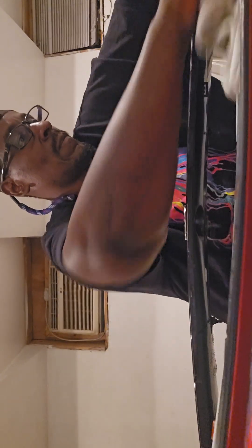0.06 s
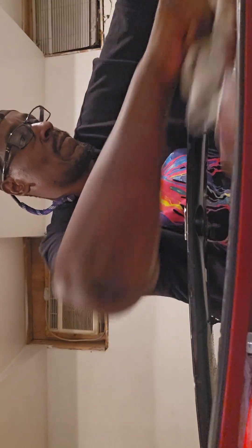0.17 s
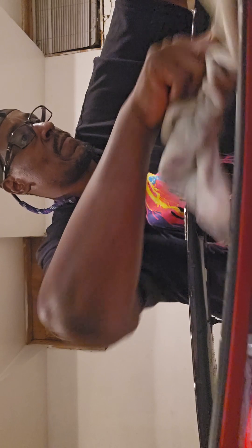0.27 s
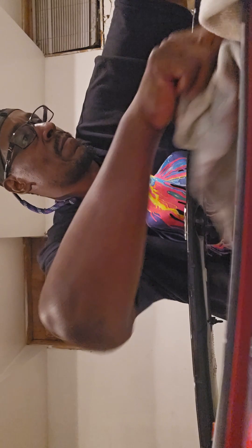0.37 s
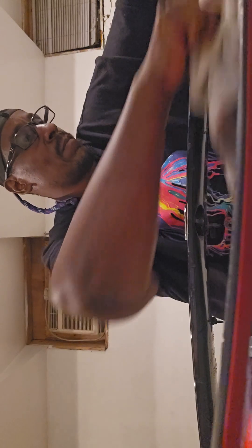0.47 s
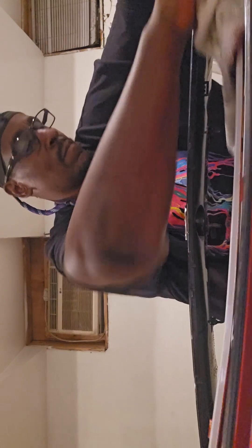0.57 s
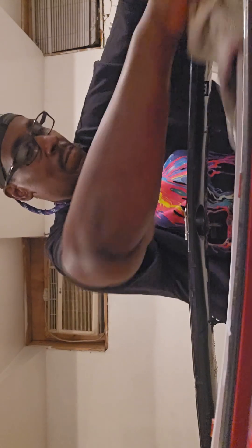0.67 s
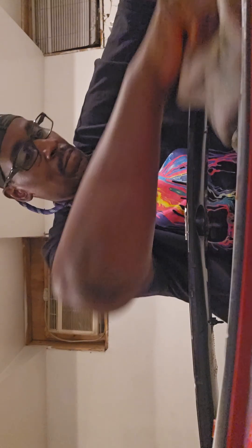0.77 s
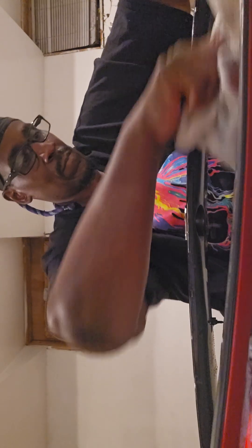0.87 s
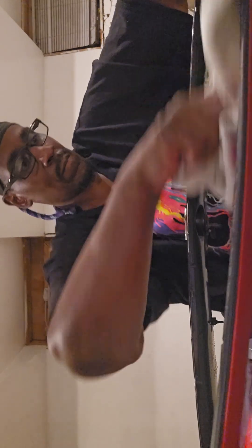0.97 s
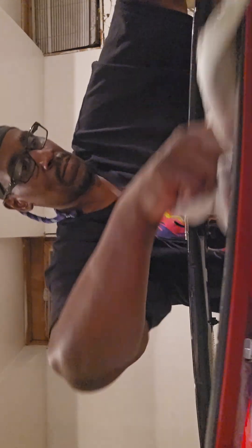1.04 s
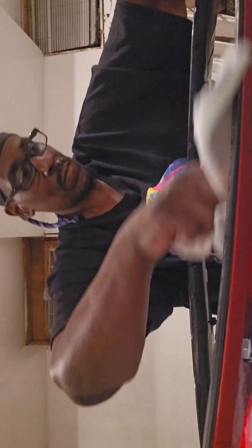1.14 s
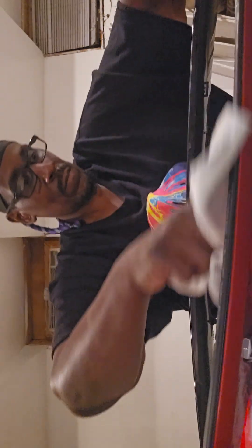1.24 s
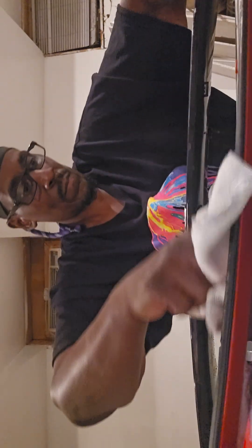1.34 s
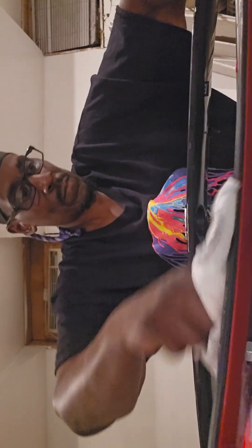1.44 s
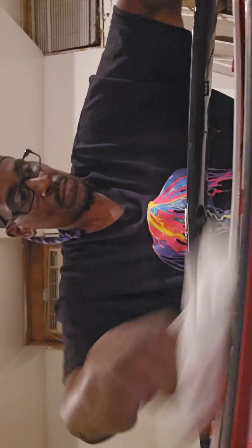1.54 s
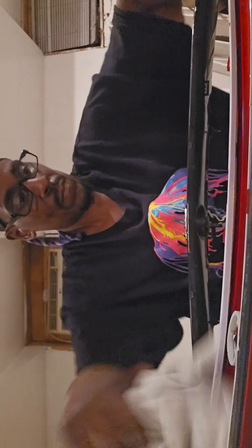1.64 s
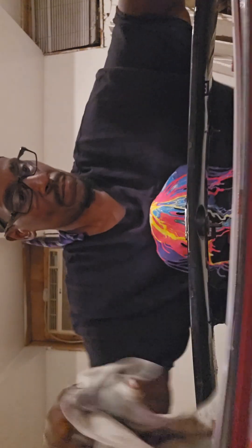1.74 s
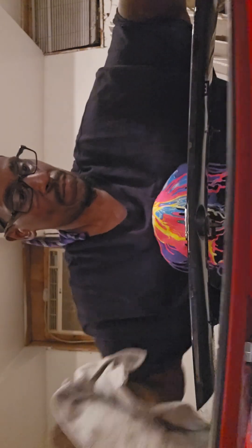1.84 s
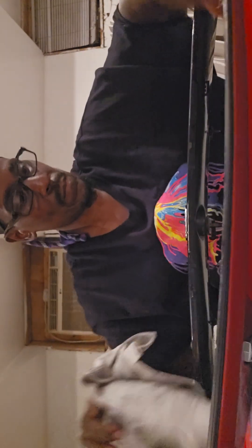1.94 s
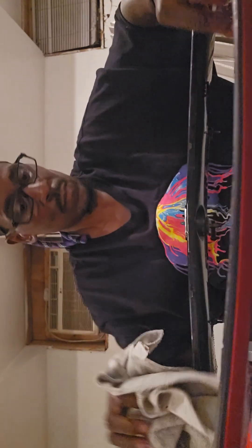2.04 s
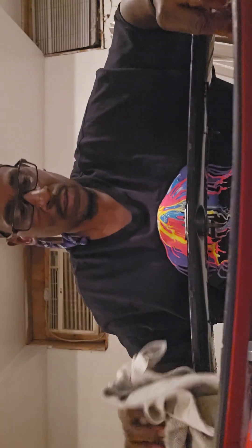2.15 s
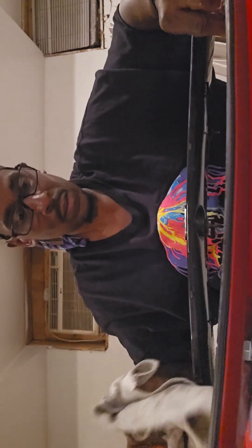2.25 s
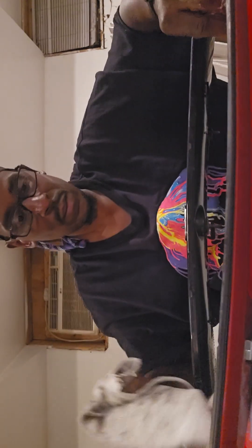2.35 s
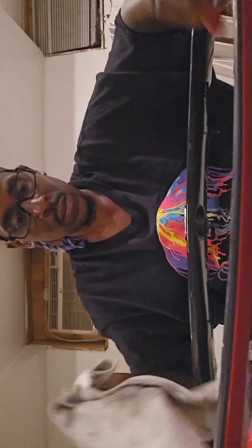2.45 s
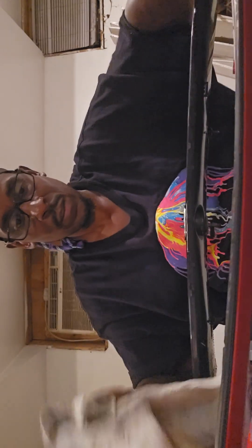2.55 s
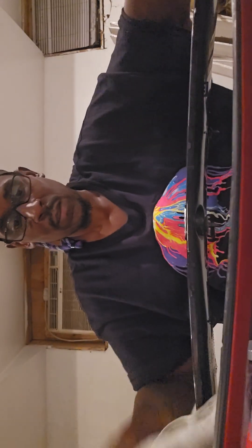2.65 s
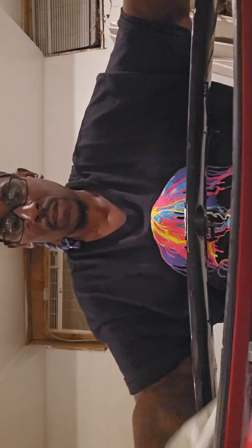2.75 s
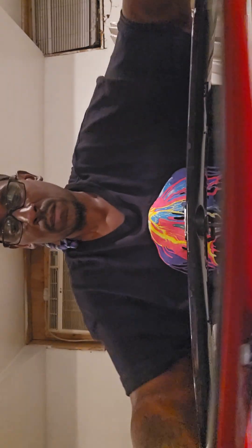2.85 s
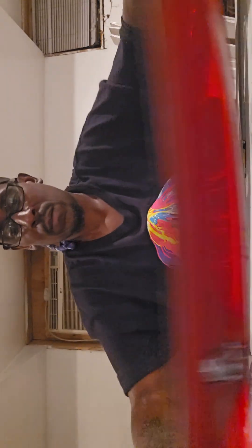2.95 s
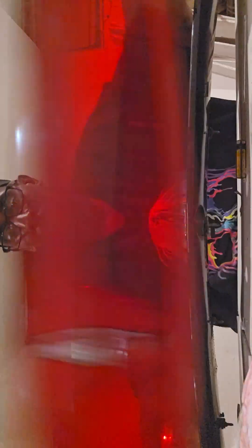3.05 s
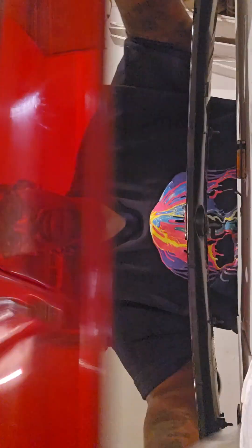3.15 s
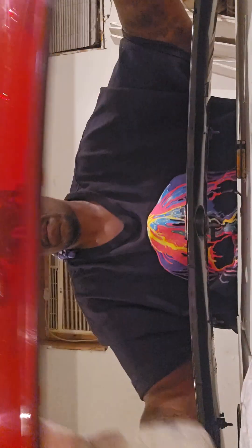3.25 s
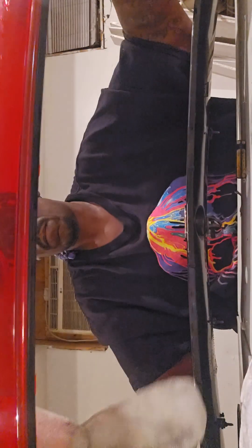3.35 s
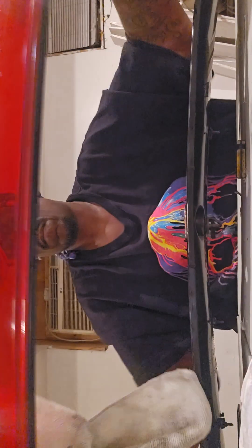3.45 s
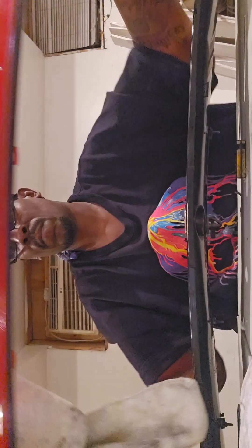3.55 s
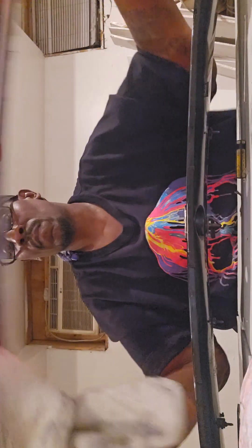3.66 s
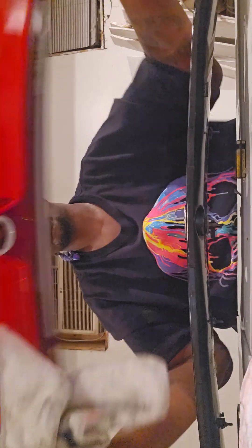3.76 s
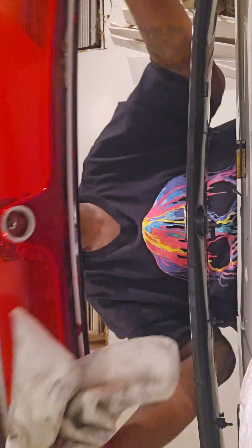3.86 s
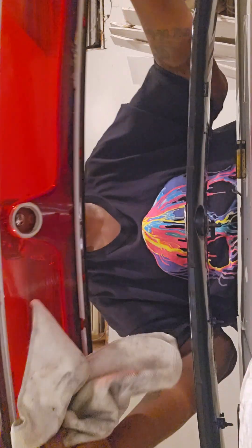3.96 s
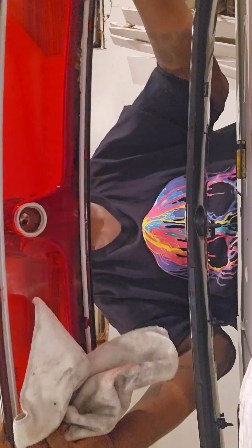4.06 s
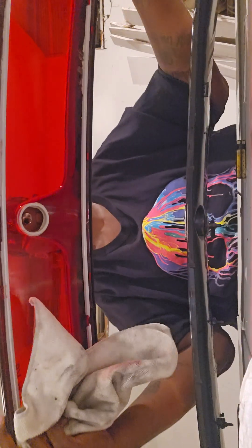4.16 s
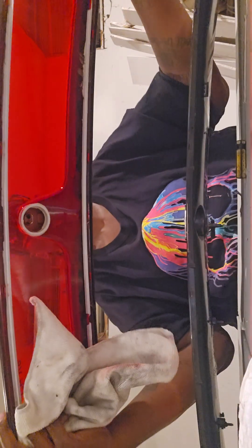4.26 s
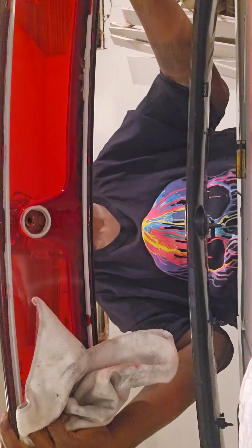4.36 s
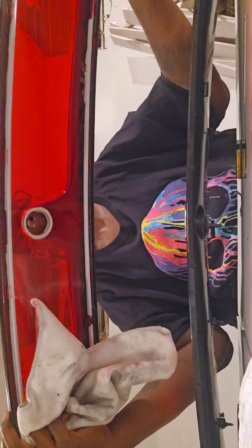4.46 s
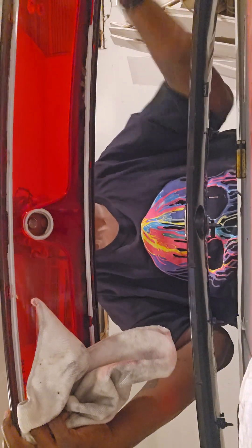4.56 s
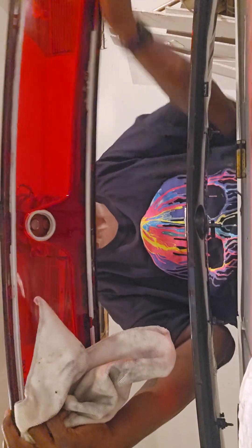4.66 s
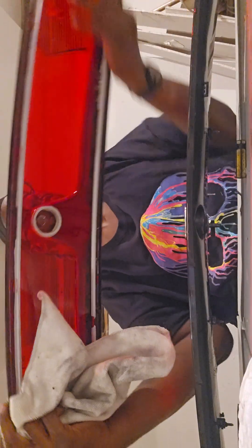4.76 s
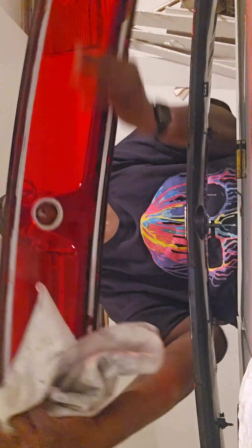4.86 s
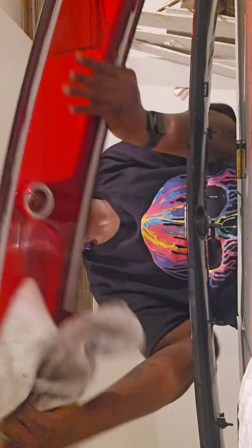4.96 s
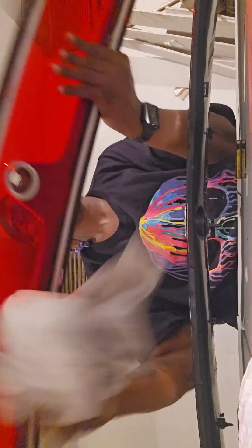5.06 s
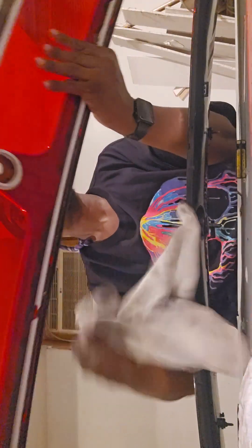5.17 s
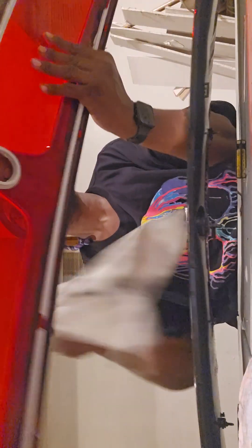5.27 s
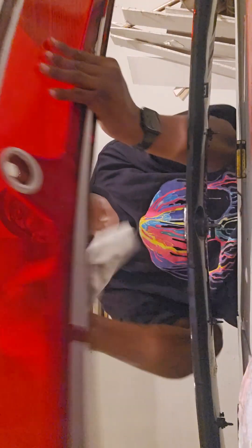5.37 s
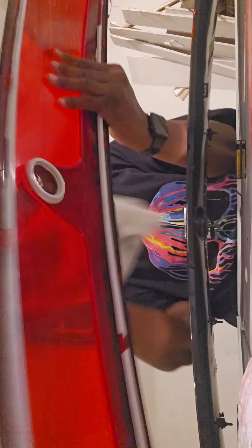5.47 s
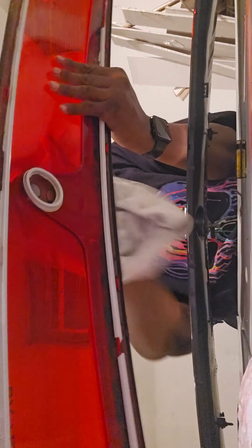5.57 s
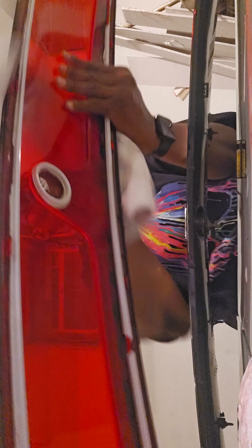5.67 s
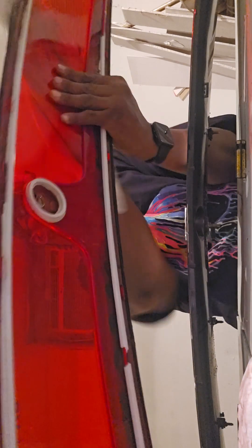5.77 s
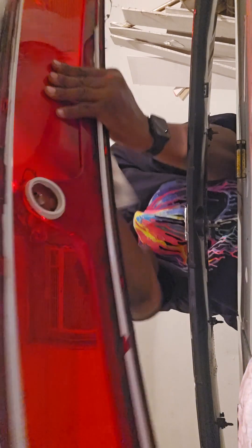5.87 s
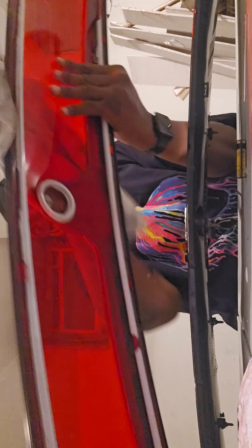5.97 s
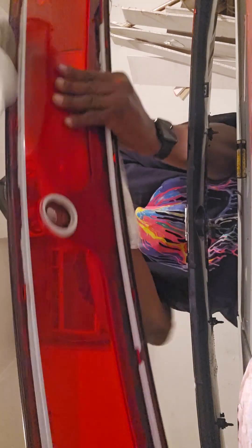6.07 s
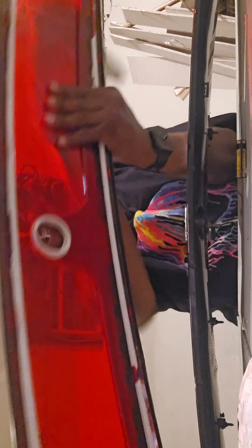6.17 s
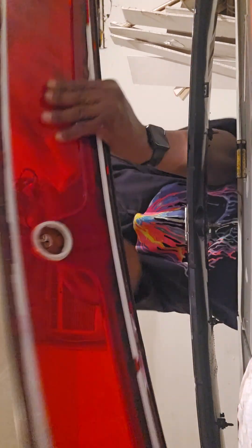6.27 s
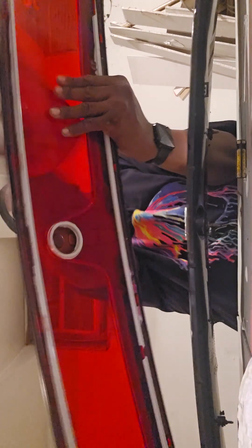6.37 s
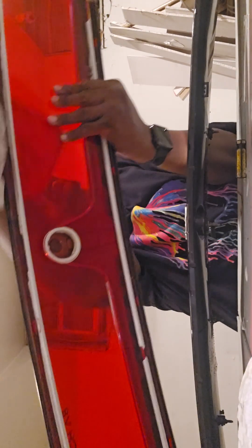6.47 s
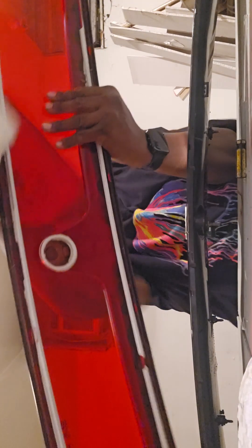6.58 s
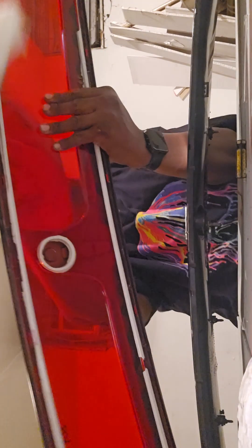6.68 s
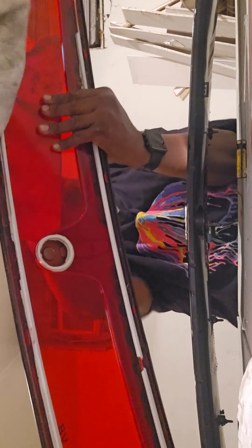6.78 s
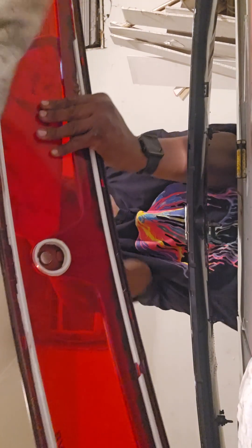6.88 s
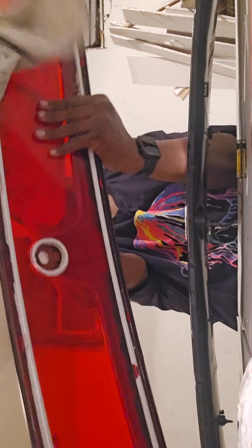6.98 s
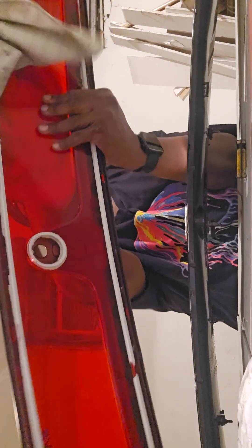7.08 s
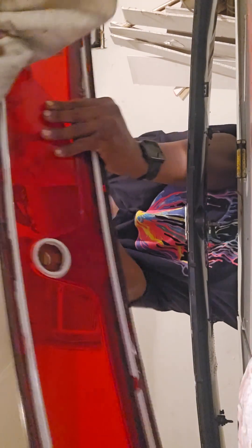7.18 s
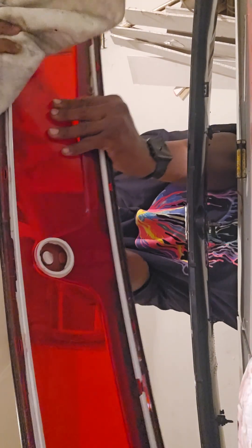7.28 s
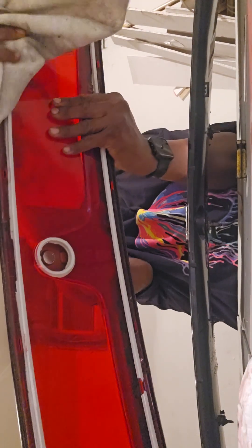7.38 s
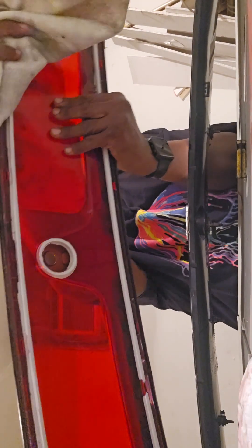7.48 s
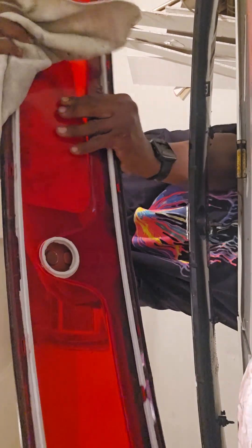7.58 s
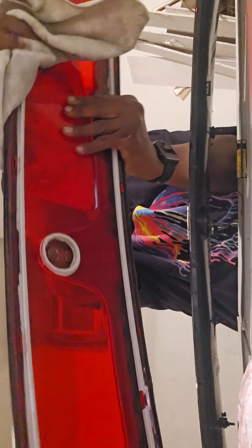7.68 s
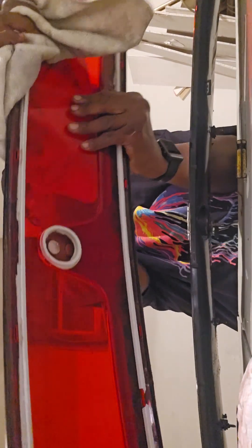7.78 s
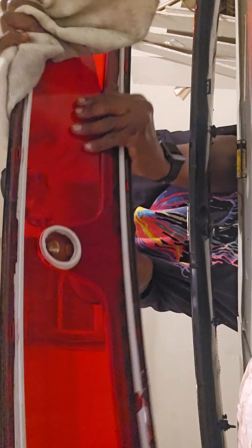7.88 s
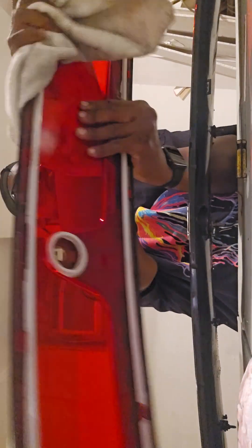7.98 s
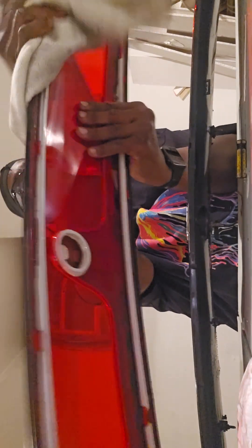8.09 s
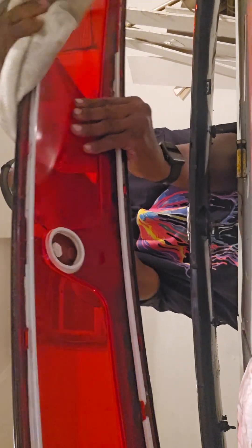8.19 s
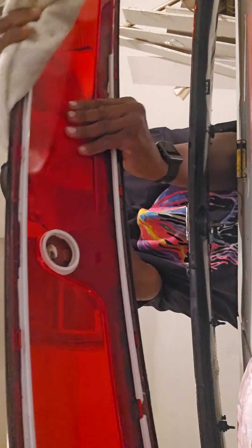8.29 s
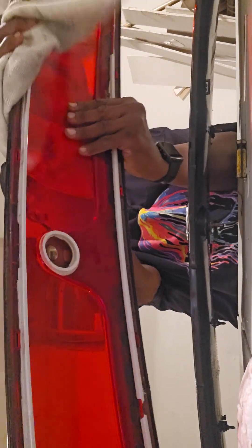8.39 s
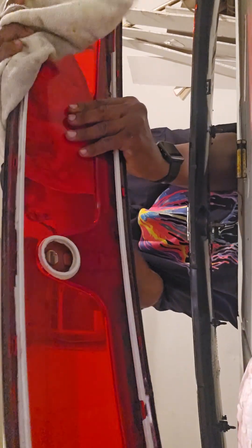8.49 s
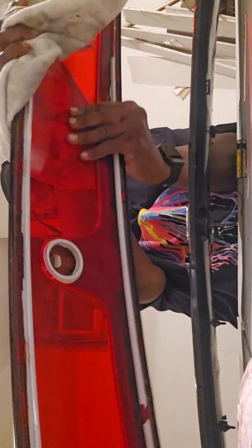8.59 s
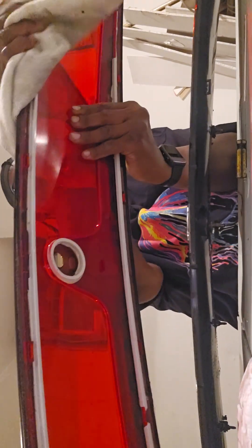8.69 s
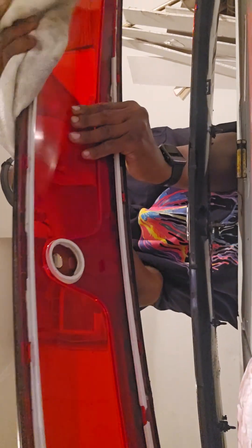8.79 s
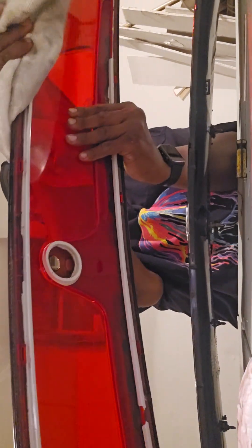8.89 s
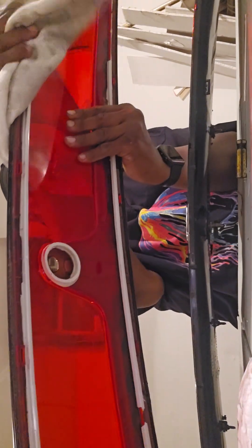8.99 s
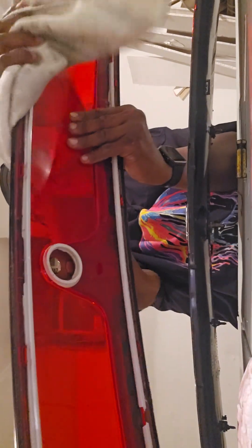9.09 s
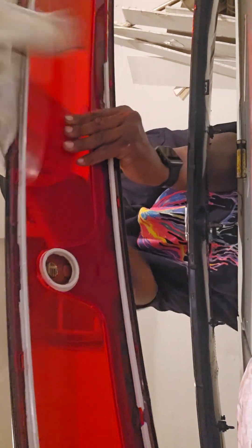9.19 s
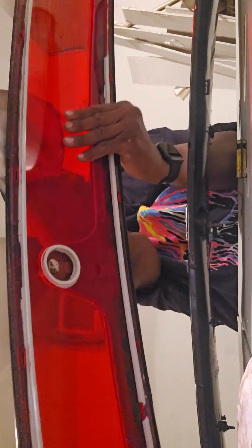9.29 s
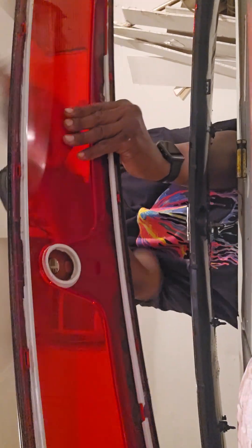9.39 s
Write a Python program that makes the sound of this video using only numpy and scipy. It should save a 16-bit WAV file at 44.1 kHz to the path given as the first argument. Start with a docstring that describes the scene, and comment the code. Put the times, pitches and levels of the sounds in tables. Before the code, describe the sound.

Close up in a small workshop, a cloth wipes a hollow plastic lens, starting with a cluster of sharp clicks. A scrape, a dull bump and a brief crackle of bunched cloth follow, then the handling goes quiet. The wiping resumes with heavier hollow knocks and scattered ticks, shifting from slightly left towards the right. The contacts have a short room echo, and a low hum wavers underneath.

```python
"""A dry cloth wipes a long plastic lamp lens on a bench in a small workshop, close to a phone's two mics.
The cloth drags and hisses in strokes, and crackles once as it is bunched up. The hollow lens booms when
the hand bumps it; its stiff edge ticks and scrapes on a frame. These contacts wake a short room echo.
Halfway through, the sound shifts from the left mic towards the right. A low hum wavers underneath."""
import sys
import numpy as np
from scipy import signal
from scipy.fft import rfft, irfft, next_fast_len
from scipy.io import wavfile

SR = 44100
rng = np.random.default_rng(int(sys.argv[2]) if len(sys.argv) > 2 else 0)


def waveform_to_disk(signal):
    """Save audio, clipped to [-1, 1], as 16-bit WAV at the path in sys.argv[1]."""
    frames = np.transpose(np.atleast_2d(signal))
    scaled = np.clip(frames, -1, 1) * 32767
    samples = np.round(scaled).astype(np.int16)
    wavfile.write(sys.argv[1], SR, samples)


N = 416304

# modes of the stiff edge and the frame: pitch_hz, level_db, t60_s
EDGE_MODES = [(525, 15, 0.015), (712, -10, 0.091), (808, -10, 0.14), (985, 6.5, 0.028), (1214, 4.5, 0.039),
              (1544, 6, 0.0088), (1661, -5.5, 0.13), (1879, 6.5, 0.029), (2066, -1.5, 0.075),
              (2212, 8, 0.016), (2980, -2, 0.0099), (3520, -0.5, 0.014), (3600, -4, 0.028),
              (3630, -6.5, 0.02)]
# where the work sits between the mics: time_s, left_lag_ms, wiping_pan_db (positive is left)
POSITION = [(0, -0.31, 0.5), (1, -0.12, 0.5), (2.4, -0.097, 0), (2.7, -0.27, 0), (3.2, -0.18, -1),
            (4.6, -0.13, 2), (5.2, -0.2, 0.5), (5.5, 0.35, -1.5), (7, .38, -0.5), (7.6, 0.37, -0.5),
            (9.44, 0.46, -1)]


def from_db(db):
    """Decibels to gain."""
    return 10 ** (np.asarray(db) / 20)


def rms_one(x):
    """Scale to unit power."""
    return x / np.sqrt(np.mean(x ** 2) + 1e-20)


def peak_one(x):
    """Scale to unit peak."""
    return x / np.max(np.abs(x))


def in_time(rows):
    """Columns of a curve at every sample."""
    times, *columns = np.transpose(rows)
    return [np.interp(np.arange(N) / SR, times, column) for column in columns]


def at_hz(points, hz):
    """A spectrum read on a log-frequency axis."""
    freqs, values = np.transpose(points)
    return np.interp(np.log(hz), np.log(freqs), values)


def every_sample(coarse):
    """Fill in a level known at every 64th sample."""
    return np.interp(np.arange(N) / 64, np.arange(len(coarse)), coarse)


def drift(rate_hz):
    """Slow random wander with spread 1, at every 64th sample."""
    r = np.exp(-2 * np.pi * rate_hz * 64 / SR)
    wander = signal.lfilter([1], [1, -2 * r, r * r], rng.standard_normal(N // 64 + 2002))
    return rms_one(wander[2000:])


def band(x, low_hz, high_hz):
    """Band-pass."""
    return signal.sosfilt(signal.butter(2, [low_hz, high_hz], "band", fs=SR, output="sos"), x)


def sides(pan_db):
    """Left and right gains; positive is left."""
    return from_db(np.array([pan_db / 2, -pan_db / 2]))


def spread(mid, side, mid_share):
    """Left and right from mid and side, mixed by power."""
    return np.sqrt(mid_share) * mid + np.sqrt(1 - mid_share) * side * [[1], [-1]]


def stereo_noise(length, own):
    """Noise both mics share, plus some of each one's own."""
    shared, *apart = rng.standard_normal((3, length))
    return (shared + own * np.array(apart)) / np.sqrt(1 + own ** 2)


def add(out, start_s, sound, pan_db):
    """Lay a short stereo sound into the track."""
    i = round(start_s * SR)
    out[:, i:i + sound.shape[1]] += sides(pan_db)[:, None] * sound[:, :N - i]


def ring(force, modes):
    """A force sets every mode ringing; neighbours swing in opposite sign."""
    out = 0
    for k, (hz, level_db, t60_s) in enumerate(modes):
        r, w = from_db(-60 / (t60_s * SR)), 2 * np.pi * hz / SR
        swing = signal.lfilter([0, np.sin(w)], [1, -2 * r * np.cos(w), r * r], force)
        out = out + (-1) ** k * from_db(level_db) * swing
    return out


def struck(modes, centre_hz, focus_db, chance_db):
    """A contact drives the modes focus_db less per octave from its centre, each with some chance."""
    return [(hz, db - focus_db * abs(np.log2(hz / centre_hz)) + chance_db * rng.standard_normal(), t60_s)
            for hz, db, t60_s in modes]


def stroke_powers():
    """Strokes swell, hold and die over a resting level: each part's power at every 64th sample."""
    # cloth and hand passing over the lens: start_s, hold_s, rumble_db, drag_db, hiss_db, air_db
    strokes = [(0.0, 0.0056, -60, -58.5, -59.5, -55.5), (0.14, 0.15, -59, -65, -62.5, -58.5),
               (0.298, 0.041, -53, -44.5, -46, -64.5), (0.509, 0.22, -50.5, -52.5, -65.5, -62.5),
               (0.829, 0.21, -57, -59.5, -64, -60.5), (1.087, 0.3, -60, -60, -65, -60),
               (1.477, 0.23, -58, -61.5, -69, -64.5), (1.765, 0.04, -51.5, -52.5, -56, -56),
               (1.912, 0.22, -63, -69.5, -72, -66), (2.362, .12, -66, -61.5, -71.5, -71),
               (2.568, 0.31, -62, -68, -77, -78), (2.825, 0.063, -54, -53, -57.5, -71.5),
               (3.01, 0.083, -64, -60, -65.5, -69), (3.226, 0.083, -65.5, -69.5, -69, -64),
               (3.452, 0.36, -74.5, -83, -86, -86.5), (3.786, 0.1, -81, -73, -67.5, -65),
               (3.931, 0.019, -63.5, -66.5, -68, -62), (4.176, 0.033, -80, -88, -78.5, -70),
               (4.679, 0.32, -73.5, -67, -62, -56.5), (5.12, 0.033, -66, -66, -76, -80),
               (5.318, 0.059, -49, -56, -64.5, -59), (5.584, 0.12, -51, -55.5, -61, -69.5),
               (5.778, 0.043, -51.5, -54, -68, -78), (5.92, 0.071, -52, -75, -79.5, -80),
               (6.06, 0.027, -43.5, -49, -68, -81), (6.172, 0.37, -50, -58, -70, -71),
               (6.49, 0.12, -45.5, -52.5, -70, -117), (6.646, 0.13, -46.5, -56, -69.5, -67),
               (6.913, 0.17, -53.5, -64.5, -70.5, -75), (7.2, 0.054, -57, -63, -70, -63.5),
               (7.312, 0.055, -56, -55, -62.5, -87), (7.453, 0.055, -58, -70.5, -76, -84),
               (7.635, .13, -51, -58, -64.5, -68), (7.902, 0.11, -45.5, -62.5, -69.5, -64),
               (8.131, 0.16, -46.5, -53.5, -66, -85), (8.45, 0.12, -54, -66.5, -76, -76),
               (8.609, .08, -45.5, -58.5, -68.5, -63.5), (8.786, .05, -68, -62.5, -76, -75),
               (9.103, 0.0079, -67.5, -68.5, -71, -76), (9.22, 0.084, -52.5, -60.5, -65.5, -64),
               (9.31, 0.034, -48, -65.5, -69.5, -78)]
    # envelopes of rumble, drag, hiss and air: rise_db_per_s, fall_db_per_s, rest_db
    shapes = [(136.5, 67, -72.5), (250, 88, -78), (350, 134, -96.5), (450, 220.5, -102)]
    t = np.arange(N // 64 + 2) * 64 / SR
    start_s, hold_s, *parts_db = (column[:, None] for column in np.transpose(strokes))
    early_s, late_s = np.maximum(start_s - t, 0), np.maximum(t - start_s - hold_s, 0)
    return [from_db(2 * (part_db - rise * early_s - fall * late_s)).sum(axis=0) + from_db(2 * rest_db)
            for part_db, (rise, fall, rest_db) in zip(parts_db, shapes)]


def cloth_wiping(flicker_db, fibres_per_s, fibre_db):
    """Friction noise with snapping fibres, in third-octave bands that each flicker."""
    # spectra of lens rumble, cloth drag, hiss and airy top: freq_hz, density_db
    rumble = [(70, -11.5), (110, 4), (160, 1.5), (230, -3), (350, -9.5), (500, -11), (900, -71)]
    drag = [(250, -27), (450, -5.5), (700, -3), (1000, -9), (1500, -11), (2000, -19), (2800, -15),
            (4500, -29.5)]
    hiss = [(1500, -15.5), (3000, -5), (4200, -7), (5800, -4), (7500, -4), (10000, -18), (13000, -25.5)]
    air = [(6000, -13.5), (9000, 10.5), (12000, 35.5), (16000, -53)]
    # how alike the two mics hear the cloth: freq_hz, mid_share
    likeness = [(60, 0.38), (200, 0.97), (600, 0.71), (2000, 0.57), (5000, 0.34), (12000, .4)]
    edges = 70 * 2 ** np.arange(0, 8.1, 1 / 3)
    centres = np.sqrt(edges[1:] * edges[:-1])
    shares = [from_db(2 * at_hz(part, centres)) * centres for part in (rumble, drag, hiss, air)]
    powers = stroke_powers()
    friction = rng.standard_normal((2, 2, N))   # two mid/side pairs, for alternate bands
    snaps = rng.random(N) < fibres_per_s / SR
    sizes = from_db(fibre_db + 2.5 * np.minimum(rng.exponential(1, N), 5))
    friction[:, 0] += snaps * sizes * rng.choice([-1, 1], N)
    out, common_drift = 0, drift(15)
    for k, hz in enumerate(centres):
        mid, side = map(rms_one, band(friction[k % 2], edges[k], edges[k + 1]))
        level = np.sqrt(sum(power * share[k] / share.sum() for power, share in zip(powers, shares)))
        flicker = from_db(flicker_db * (0.8 * common_drift + drift(18) + 0.5 * drift(5)))
        out = out + every_sample(level * flicker) * spread(mid, side, at_hz(likeness, hz))
    _, pan_db = in_time(POSITION)
    return (out + lens_singing(drag_and_hiss=np.sqrt(powers[1:3]))) * sides(pan_db)


def lens_singing(drag_and_hiss):
    """The rubbed lens sings faintly in two narrow resonances that come and go with the contact."""
    # one resonance under the drag, one under the hiss: pitch_hz, relative_db, t60_s
    resonances = [(2050, -12, 0.021), (5584, -10.5, .012)]
    out = 0
    for level, (hz, relative_db, t60_s) in zip(drag_and_hiss, resonances):
        tone = rms_one(ring(stereo_noise(N, own=0.56), [(hz, 0, t60_s)]))
        out = out + every_sample(level * from_db(relative_db + 3 * drift(4))) * tone
    return out


def low_hum():
    """Noise in three low resonances swells and sinks, nearly alike at both mics."""
    # level of the hum: time_s, level_db
    swells = [(0.0, -58), (0.26, -58), (0.73, -48.5), (2.02, -56), (2.55, -55), (2.84, -43), (3.18, -62),
              (5.12, -69), (5.52, -43.5), (6.42, -69), (6.62, -46), (7.02, -64), (8.12, -56), (8.33, -60.5),
              (8.7, -50.5), (8.96, -63), (9.2, -59), (9.44, -44.5)]
    # its resonances: pitch_hz, width_hz, level_db
    resonances = [(40.8, 31, -5.5), (55.5, 23, -7.5), (75, 23, -2.5)]
    modes = [(hz, db, np.log(1000) / (np.pi * width_hz)) for hz, width_hz, db in resonances]
    mid, side = (rms_one(band(ring(noise, modes), 38, 90)) for noise in rng.standard_normal((2, N)))
    return from_db(in_time(swells)[0]) * spread(mid, side, mid_share=0.95)


def edge_ticks(rattle_s):
    """The edge taps the frame: a sharp crack with a moment of rattle; its dull part rings briefly."""
    # hard contacts: start_s, crack_db, dull_relative_db, dull_centre_hz, bright_relative_db, pan_db
    contacts = [(0.2192, -29.5, -18.5, 1310, -5, 3), (0.2364, -27, -7, 684, -7, 12.5),
                (0.2843, -18, -8.5, 1180, 4, -7), (0.3479, -24, -2.5, 2060, -2, 7.5),
                (0.356, -22.5, -46, 1860, -5, -2), (0.629, -41.5, 8, 1210, -26, 3),
                (1.3726, -30, -23, 710, -13, 3.5), (1.3983, -43, -22, 1430, -21, 21),
                (1.6532, -54.5, 16.5, 1260, -23, 14.5), (1.918, -43, -1, 2110, 3, 0.5),
                (1.943, -31, -16, 1820, -21, 2), (1.963, -33, -16, 1680, -20, 1),
                (2.0772, -50.5, -6, 1720, 22.5, 2), (2.083, -28.5, -19.5, 1240, -22, 4),
                (2.2038, -39, -12.5, 885, -25, 3.5), (2.3264, -60.5, 12, 1660, -21, 9),
                (2.356, -47, 6, 2530, -10, 8), (2.367, -49.5, -17.5, 730, 19.5, -14.5),
                (2.378, -31, -29.5, 2030, -18, 7), (2.4555, -40.5, -16, 810, -26, 12),
                (2.597, -35.5, -16.5, 1310, -37.5, 7), (3.0803, -33, -5, 2296, -34.5, 13.5),
                (3.237, -41.5, -11, 910, -1, 0), (3.2647, -24, -32, 872, -15, 3),
                (4.096, -53.5, -1, 700, -31.5, 3), (4.17, -46.5, -12.5, 768, 6, -1),
                (4.214, -59.5, -22.5, 780, 8, 7), (5.0275, -43.5, -4.5, 780, -18, 8),
                (5.2883, -46.5, -2.5, 980, -7, 15.5), (5.3234, -56, -22.5, 910, 19, -9),
                (5.3722, -30.5, 1.5, 940, -27.5, -3.5), (5.5699, -11.5, -12.5, 1720, -17, -4),
                (5.7914, -33, -7, 2080, -40, -18), (6.0294, -34.5, -4.5, 1960, -36, -19),
                (6.4468, -39, -40, 703, -3, 25), (6.4657, -19.5, -6, 686, -6, -15.5),
                (6.7128, -34, -28, 703, -28, -2), (6.72, -34, -11.5, 740, -32, -13),
                (6.9177, -49, 5, 1790, -26, 10), (7.2941, -22.5, -6.5, 715, -2.5, -9.5),
                (7.6901, -30.5, -4, 1840, -5, 2), (7.9235, -51, -25, 1200, 10, 3.0),
                (7.9605, -39, -23, 734, -6.5, 3), (8.1275, -17.5, -8, 690, -12.5, -10),
                (8.5162, -37, -7.5, 870, -11, 2), (8.6131, -38, 1.5, 960, -27, 2),
                (9.106, -54, -6, 1020, -35, 19), (9.226, -50, 7, 640, -12, 9)]
    out, t = np.zeros((2, N)), np.arange(SR // 10) / SR
    for start_s, crack_db, dull_db, hz, bright_db, pan_db in contacts:
        force = 0.11 * stereo_noise(len(t), own=0.7) * np.exp(-t / rattle_s)
        force[:, 0] += 1   # the impact
        crack = peak_one(band(force, 2800, 14000))
        ringing = ring(force, struck(EDGE_MODES, hz, focus_db=10, chance_db=6.5))
        dull = from_db(dull_db) * peak_one(band(force, 0.55 * hz, 1.24 * hz) + 0.03 * ringing)
        bright = from_db(bright_db) * peak_one(band(force, 8130, 12000))
        add(out, start_s, from_db(crack_db) * (crack + dull + bright), pan_db)
    return out


def edge_scrapes(hard_slips_per_s):
    """The edge slides on the frame in dense uneven slips that hiss and leave it ringing."""
    # slides: start_s, rise_s, fall_s (per 20 dB), dull_db, centre_hz, bright_db, pan_db
    slides = [(.225, 0.0034, 0.025, -38, 1420, -48.5, 6.5), (0.287, 0.0059, 0.06, -31.5, 1490, -33, 0),
              (.24, 0.0038, 0.026, -46.5, 3500, -52, 7), (.62, 0.0043, 0.036, -45.5, 3620, -60, 5),
              (0.729, 0.0043, 0.018, -47.5, 3500, -76, 1), (1.541, 0.034, 0.11, -59, 1080, -70, 3),
              (1.765, 0.029, 0.046, -37.5, 2360, -48, 3), (2.745, .01, .12, -45, 1405, -57.5, 2),
              (2.799, 0.0098, 0.037, -24.5, 1096, -36.5, 1), (2.802, 0.012, 0.027, -38, 3600, -47.5, 26.5),
              (2.81, .015, .02, -33, 2090, -57.5, 4.5), (2.825, 0.0036, 0.04, -58, 1520, -37.5, -2),
              (5.576, 0.0021, 0.036, -50, 1970, -74, 0), (5.795, 0.0062, 0.039, -46.5, 2110, -57, -3),
              (6.03, 0.0025, 0.026, -38, 2020, -46, 1), (6.44, 0.036, 0.017, -39.5, 1030, -39.5, 6.5),
              (6.92, 0.02, 0.026, -53, 1370, -66, 0), (7.175, .015, 0.016, -44, 815, -60, 2),
              (7.3, 0.0027, 0.13, -51.5, 1040, -52, -7.5), (7.61, 0.045, 0.035, -78, 800, -62, -7),
              (7.7, 0.026, 0.029, -48.5, 1070, -60, -6), (7.9, 0.061, 0.071, -45, 634, -81, 0),
              (8.13, 0.0042, 0.24, -73, 1050, -64.5, -26), (8.6, 0.029, 0.057, -40, 765, -50.5, -3.5),
              (9.22, 0.0045, 0.02, -44, 760, -64, -1)]
    out, t = np.zeros((2, N)), np.arange(SR // 3) / SR
    for start_s, rise_s, fall_s, dull_db, hz, bright_db, pan_db in slides:
        envelope = np.minimum(t / rise_s, 1) * from_db(-20 * np.maximum(t - rise_s, 0) / fall_s)
        slips = stereo_noise(len(t), own=0.76)
        slips *= 1 + (rng.random(len(t)) < hard_slips_per_s / SR)
        ringing = ring(envelope * slips, struck(EDGE_MODES, hz, focus_db=15, chance_db=3))
        dull = rms_one(ringing) * np.sqrt(np.mean(envelope ** 2))
        bright = envelope * rms_one(band(slips, 1700, 12000))
        add(out, start_s, from_db(dull_db) * dull + from_db(bright_db) * bright, pan_db)
    return out


def lens_bumps():
    """A soft push booms in the hollow lens, rough during the contact; then the hand damps it."""
    # the hand meeting the lens: start_s, level_db, centre_hz, pan_db, contact_s
    bumps = [(0.28, -31.5, 313, 1, 0.042), (2.743, -19, 148, -0.5, 0.024), (2.773, -22.5, 263, -1, 0.052),
             (3.907, -45, 240, 1, 0.021), (5.016, -47.5, 166, 4, 0.028), (5.283, -36.5, 88, 9, 0.018),
             (5.368, -23, 278, -1, 0.045), (5.563, -22, 126, 2, 0.015), (5.629, -32.5, 153, -1, 0.035),
             (5.789, -28, 247, -3, 0.015), (5.815, -25.5, 114, -5.5, 0.07), (6.024, -29, 136.4, 16, 0.037),
             (6.07, -34, 142, 1, 0.074), (6.308, -37, 187, -1, 0.025), (6.457, -11, 167, -3, 0.03),
             (6.477, -18.5, 164, -4, 0.029), (6.717, -26.5, 195, -6, 0.026), (6.938, -37, 127, 0, 0.071),
             (7.175, -40.5, 295, 3, 0.015), (7.289, -17, 130, 2, 0.02), (7.313, -22, 70.0, 0, 0.018),
             (8.124, -13.5, 128, -1.5, 0.022), (9.224, -39, 158, 2, 0.026)]
    # modes of the hollow lens: pitch_hz, level_db, t60_s
    lens_modes = [(45.4, -29, 0.17), (65, -16.5, 0.21), (91.5, -11, 0.067), (137.2, -2, 0.056),
                  (157.7, 0, 0.065), (173.5, -2, 0.065), (194.5, -2.5, 0.056), (230, -2.5, 0.025),
                  (273.4, -13, 0.13), (324.4, -15.5, 0.066), (436, -15, 0.077), (473, -13.5, 0.1),
                  (569, -10, 0.064), (733, -4.5, 0.03)]
    out, t = np.zeros((2, N)), np.arange(SR // 3) / SR
    softness = signal.butter(2, 520, fs=SR, output="sos")
    for start_s, level_db, hz, pan_db, contact_s in bumps:
        force = 0.048 * stereo_noise(len(t), own=0.6) * (t < contact_s)
        force[:, 0] += 1   # the impact
        boom = ring(signal.sosfilt(softness, force), struck(lens_modes, hz, focus_db=8, chance_db=0.53))
        damping = 0.31 + 0.32 * from_db(-900 * np.maximum(t - contact_s, 0))
        add(out, start_s, from_db(level_db) * peak_one(boom * damping), pan_db)
    return out


def cloth_crackle(start_s, end_s, snaps_per_s):
    """The cloth is bunched up: lone bright snaps of uneven size, left of centre."""
    t = np.arange(N) / SR
    snaps = (rng.random(N) < snaps_per_s / SR) * (t > start_s) * (t < end_s)
    sizes = from_db(-51.5 + 4 * np.minimum(rng.exponential(1, N), 3))
    return band(snaps * sizes + 1e-18, 4500, 16000) * sides(pan_db=7.5)[:, None]


def workshop_echo(x, t60_s, wall_cut_hz):
    """Near walls throw the sound back: six feedback delays a side, duller on every round."""
    size = next_fast_len(N + SR)
    hz = np.fft.rfftfreq(size, 1 / SR)
    dulling = np.sqrt(1 / (1 + 1j * hz / wall_cut_hz))
    walls = np.zeros((2, len(hz)), complex)
    for k, lag_s in enumerate(rng.uniform(0.009, 0.028, size=12)):
        delay = np.exp(-2j * np.pi * hz * round(lag_s * SR) / SR)
        loop = from_db(-60 * lag_s / t60_s) * dulling * delay
        walls[k % 2] += loop / (1 - loop) * (-1) ** (k // 2)
    return irfft(rfft(x, size) * walls, size)[:, :N]


def scene():
    """Close sounds from the bench reach one mic first; the room and the hum lie behind them."""
    hits = lens_bumps() + edge_ticks(rattle_s=0.0027)
    hits += cloth_crackle(start_s=2.6, end_s=2.9, snaps_per_s=30)
    hits += edge_scrapes(hard_slips_per_s=900)
    close = hits + cloth_wiping(flicker_db=2.5, fibres_per_s=25, fibre_db=20.5)
    left_lag_ms, _ = in_time(POSITION)
    half_lag = np.round(left_lag_ms * SR / 2000).astype(int)
    left = close[0, np.clip(np.arange(N) - half_lag, 0, N - 1)]
    right = close[1, np.clip(np.arange(N) + half_lag, 0, N - 1)]
    room = workshop_echo(band(hits.mean(axis=0), 380, 14000), t60_s=0.45, wall_cut_hz=8000)
    return np.array([left, right]) + from_db(-16) * room + low_hum()


def record(dry):
    """Each mic port of the phone colours the treble in its own way; the top is cut."""
    # responses of the two ports: freq_hz, gain_db
    left_port = [(1000, 3.5), (3000, 3.5), (5500, 7.5), (8000, 4.5), (9300, -2.5), (10300, -7),
                 (11000, -9.5), (11500, 2.5), (13500, 0), (15500, 10.5), (16000, -26.5)]
    right_port = [(1000, 2.5), (3000, 1), (5500, 9.5), (8000, -2), (10300, -22), (11500, -4.5),
                  (13500, -15), (15500, -5.5), (16000, -33)]
    hz = np.fft.rfftfreq(N, 1 / SR) + 1
    ports = from_db([at_hz(left_port, hz), at_hz(right_port, hz)])
    top_cut = signal.cheby2(14, 70, 16900, fs=SR, output="sos")
    return signal.sosfilt(top_cut, irfft(rfft(dry) * ports, N))


dry = scene()
out = record(dry)
waveform_to_disk(out)
```